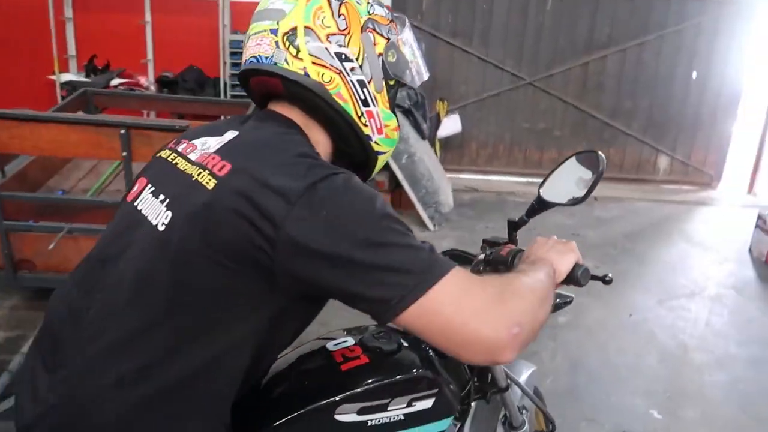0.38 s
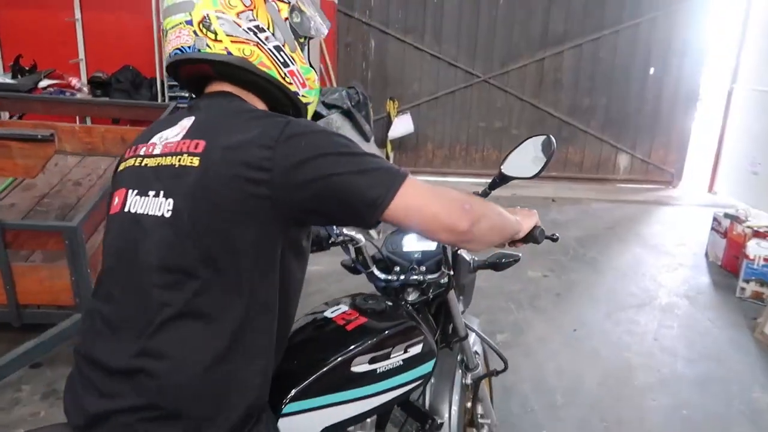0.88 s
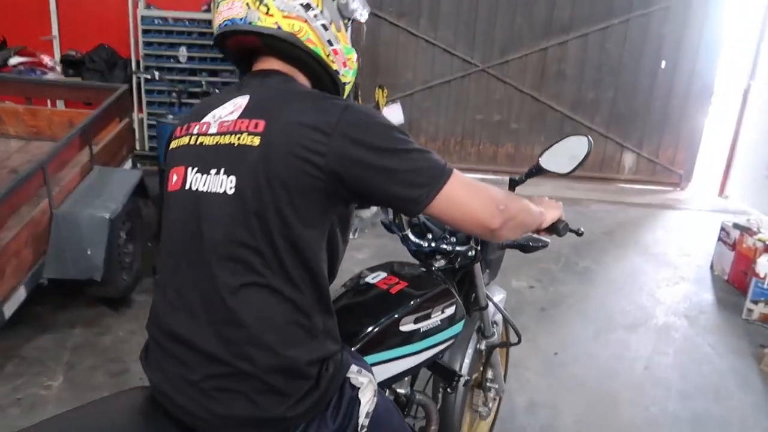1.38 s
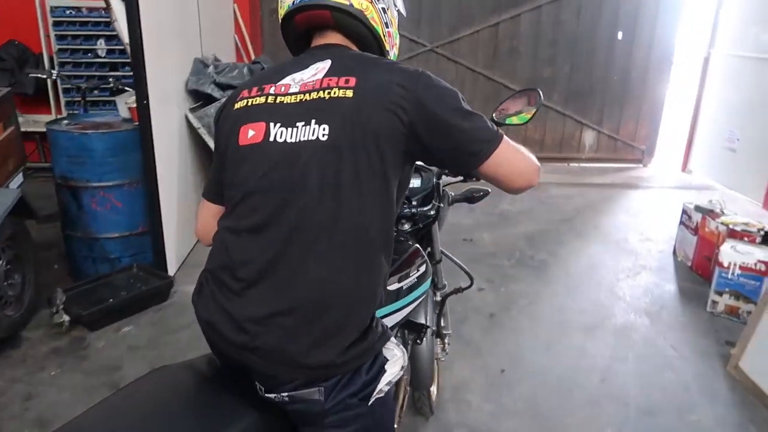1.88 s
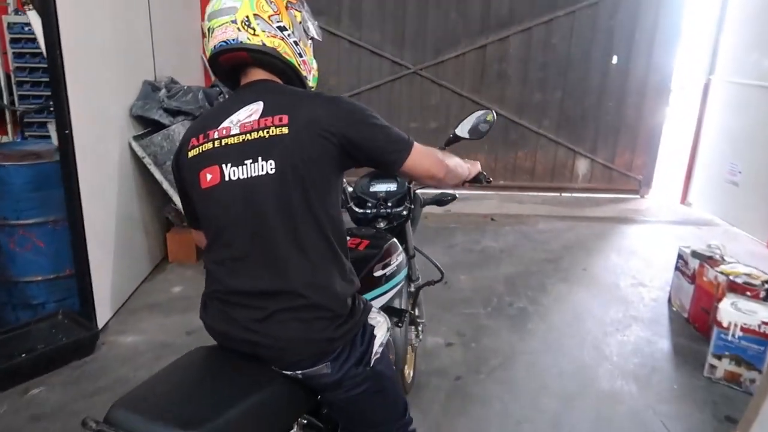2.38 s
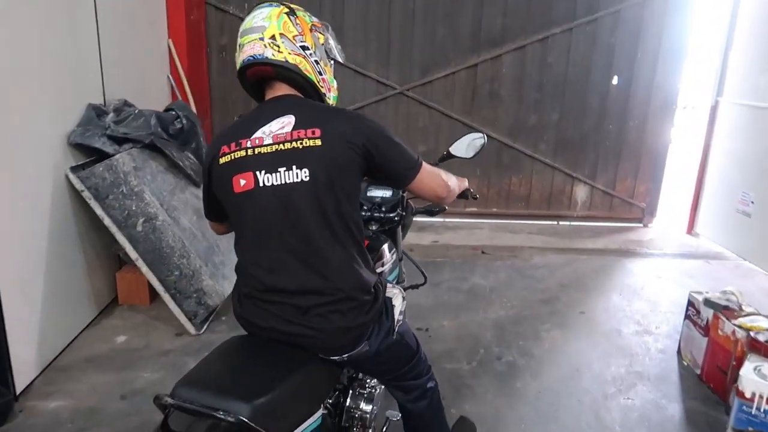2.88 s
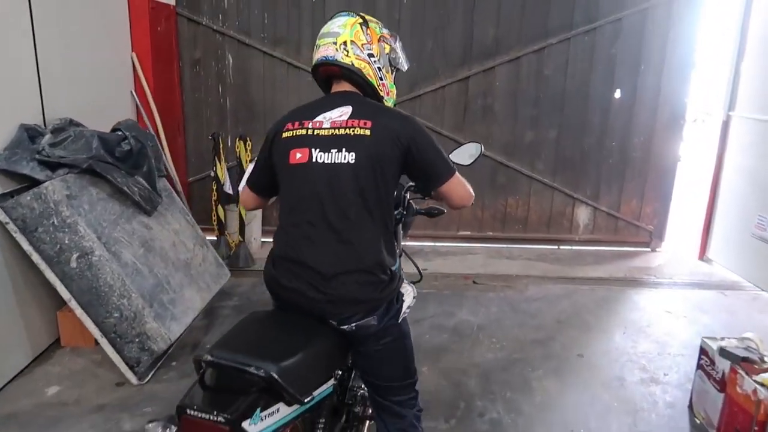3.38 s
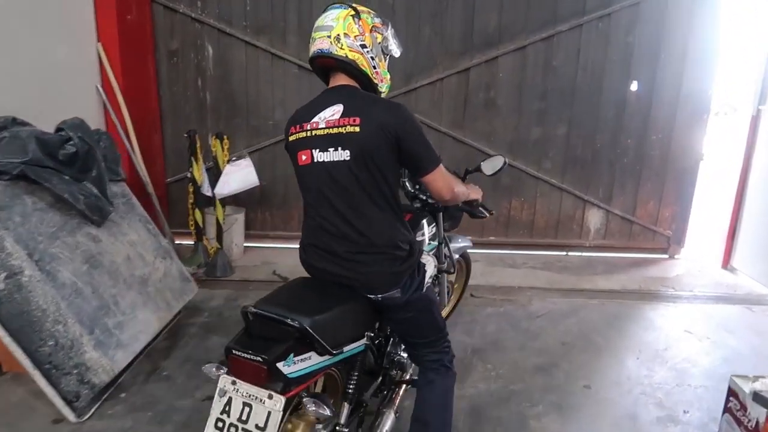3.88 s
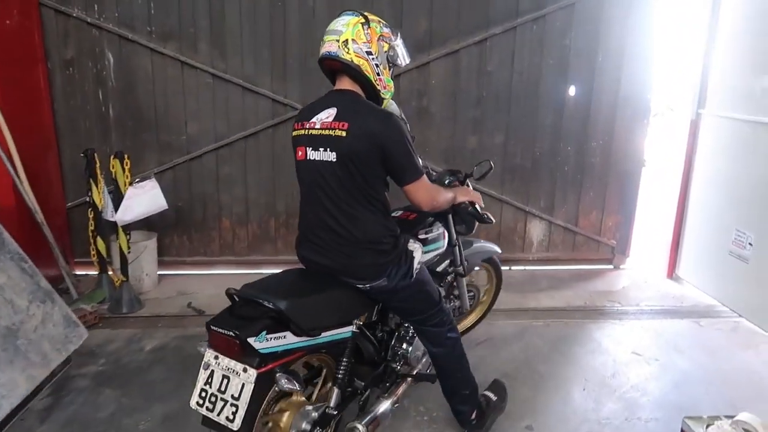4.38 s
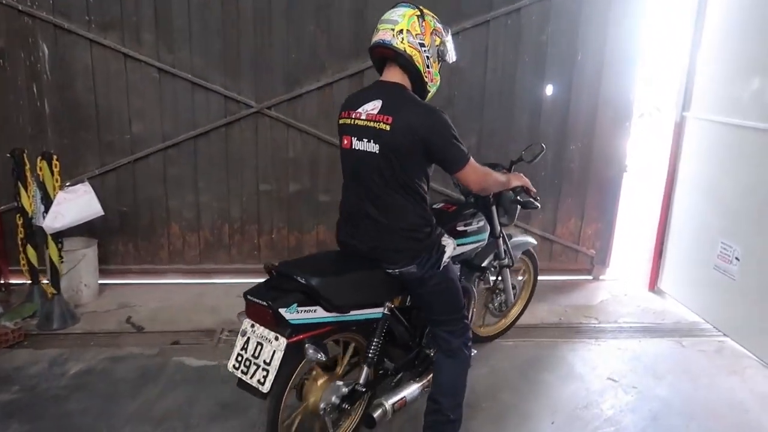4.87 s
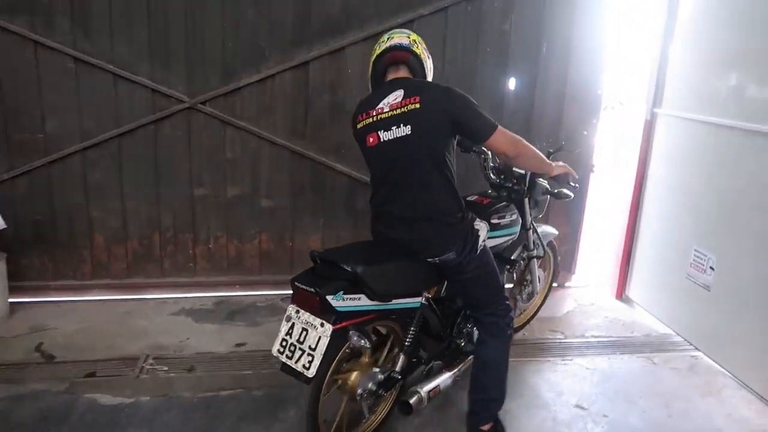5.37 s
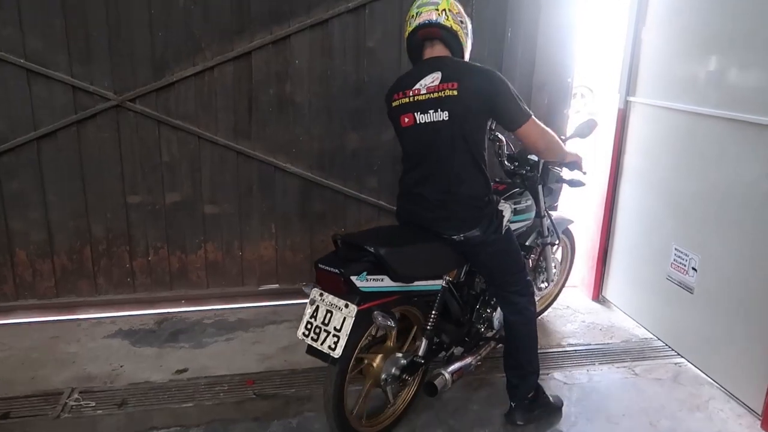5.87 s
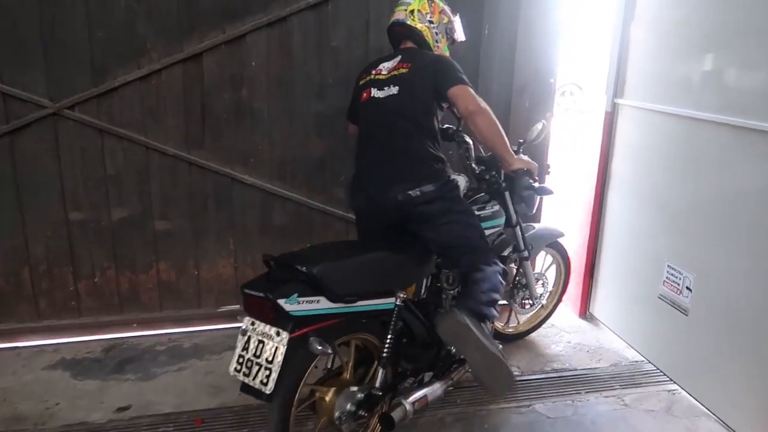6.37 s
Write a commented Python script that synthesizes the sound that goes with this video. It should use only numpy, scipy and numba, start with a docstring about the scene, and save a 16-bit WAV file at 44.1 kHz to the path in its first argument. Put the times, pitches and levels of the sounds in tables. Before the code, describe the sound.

Inside a reverberant workshop, a small single-cylinder motorcycle idles with a limping strong-weak beat and light valve clatter. The rider stabs the throttle several times, with bright exhaust cracks, then holds a faster, rough growl for about a second. Revs fall through more pops, waver, and return to a lumpy, boomy idle. A handheld microphone starts beside the engine and moves round behind the tailpipe.

```python
"""An uneven idle beat is heard first: a small single-cylinder motorcycle, then revved, in a hard-walled workshop.
Every crank turn gives a pressure pulse, strong and weak in turn, that excites resonances of pipe, silencer and room.
Turbulent gas rasps at each beat, the valve gear clatters steadily and single beats or runs of them crack brightly.
Feedback delays give the reverberation; band-limited noise gives a low rumble underneath."""
import sys
import numpy as np
from scipy import signal
from scipy.fft import rfft, irfft, next_fast_len
from scipy.io import wavfile
from scipy.ndimage import uniform_filter1d
from numba import njit

SR = 44100
rng = np.random.default_rng(int(sys.argv[2]) if len(sys.argv) > 2 else 0)


def volts_from_db(level):
    """Convert decibel levels to linear amplitude ratios."""
    exponent = np.asarray(level, float) / 20
    return 10 ** exponent


def put_to_file(sound):
    """Save the sound as 16-bit audio at rate SR, in the file named by the first command-line argument."""
    columns = np.atleast_2d(sound).T  # one column per channel
    safe = np.clip(columns, -1, 1)
    whole_steps = np.round(safe * 32767)
    wavfile.write(sys.argv[1], SR, whole_steps.astype(np.int16))


N = 286650

# speed of the crank: (time [s], speed [turns per s])
CRANK = [(0.0, 19.44), (0.55, 22.19), (1.2, 21.79), (1.79, 19.9), (1.95, 27.51), (2.08, 26.92),
         (2.19, 20.51), (2.4, 30.18), (2.5, 28.21), (2.65, 23.75), (2.74, 30.63), (2.87, 38.27),
         (3.7, 36.88), (3.8, 35.22), (3.87, 31.27), (3.96, 30.06), (4.05, 25.35), (4.12, 25.2), (4.2, 23.1),
         (4.3, 24.5), (4.37, 25.75), (4.45, 25.95), (4.7, 26.89), (4.93, 25.61), (5.06, 22.64),
         (6.5, 20.63)]
# how much stronger and earlier every second turn beats: (time [s], limp [0-1])
LIMP = [(0, 1), (1.8, 1), (1.9, .3), (2.75, .3), (2.85, 0), (4.1, 0), (4.16, .75), (4.85, .7), (4.95, 0),
        (5.02, .7), (5.5, 1), (6.5, 1)]
# position of the listener round the tailpipe: (time [s], position [0 beside - 1 behind])
BEHIND = [(0, 0.39), (1.3, 0.027), (2.0, 0.99), (4.0, 0.9), (5.5, 0.73), (6.5, 0.87)]
# resonances of the engine castings: (frequency [Hz], width [Hz], level [dB])
METAL_MODES = [(495.6, 45.6, 4.5), (686, 27, 1.5), (940, 960, -36.5), (1343, 89, 7), (1567, 284, 0.5),
               (2063, 54, 5.5), (2860, 83, -5.5)]
# single beats that crack brightly, a few at idle and most while the engine is revved,
# sizes before the layer gains: (time [s], peak [dB], treble [dB], ring frequency [Hz])
CRACKLE = [(0.323, -12, -45.5, 1500), (1.237, -18.5, -50.5, 826), (1.274, -15, -48.5, 2100),
           (1.9, -5.5, -29.5, 860), (1.936, -7, -36, 1280), (1.968, -23, -40, 630),
           (2.012, -12, -36.5, 1470), (2.045, -13, -35.5, 1250), (2.083, -9, -39, 1300),
           (2.123, -15.5, -37.5, 730), (2.3, -8, -33, 680), (2.337, -13, -35.5, 1310),
           (2.367, -14, -37, 664), (2.408, -26, -40, 970), (2.439, -11, -42, 860), (2.468, -23.5, -37, 885),
           (2.506, -12.5, -37, 940), (2.543, -16, -37, 815), (2.583, -23, -38.5, 899),
           (2.736, -7.5, -31.5, 970), (2.768, -9, -29.5, 676), (2.797, -14.5, -33.5, 760),
           (3.198, -11.5, -37.5, 1540), (3.655, -10.5, -36, 810), (3.734, -11, -47.5, 830),
           (3.764, -22, -45, 824), (3.88, -14.5, -42.5, 680), (3.911, -27, -37.5, 594),
           (3.944, -28, -35.5, 905), (3.976, -19, -37.5, 960), (4.01, -15.5, -37, 880),
           (4.05, -13.5, -40, 774), (4.094, -38.5, -43.5, 666), (4.87, -20, -39, 925),
           (4.91, -31, -38, 800), (4.949, -26, -36.5, 720), (5.026, -15, -37, 700)]
IDLE_SPEED = 22   # turns per s
PUFF_SPREAD_DB = 0.8   # chance in the strength of the gas puffs, before it grows with speed


def rms_one(x):
    """Normalization: scale to rms 1."""
    return x / np.sqrt(np.mean(x ** 2) + 1e-20)


def evened(x, span_s=0.69):
    """Envelope normalization: divide out the slow level, keeping the beat."""
    span = int(span_s * SR)
    power = uniform_filter1d(uniform_filter1d(x ** 2, span), span)
    return x / np.sqrt(power + 1e-12)


def in_time(rows):
    """Linear interpolation: the columns of a curve table at every sample."""
    s, *columns = np.transpose(rows)
    return [np.interp(np.arange(N) / SR, s, c) for c in columns]


def coloured(x, points):
    """Linear filtering: weight the spectrum by a (frequency [Hz], gain [dB]) curve."""
    hz, db = np.transpose(points)
    grid = np.arange(N // 2 + 1) * SR / N + 1
    gain_db = np.interp(np.log(grid), np.log(hz + 1), db)
    return irfft(rfft(x) * volts_from_db(gain_db), N)


def cut(x, hz, kind):
    """Band limitation by a second-order Butterworth edge."""
    return signal.sosfilt(signal.butter(2, hz, kind, fs=SR, output="sos"), x)


def hump(x, low_hz, high_hz):
    """Zero-phase filtering: each click becomes an even hump that swells and falls alike."""
    return signal.sosfiltfilt(signal.butter(1, [low_hz, high_hz], "band", fs=SR, output="sos"), x)


def dying(clicks, decay_s):
    """Exponential relaxation: each click becomes a jump that dies away."""
    return signal.lfilter([1], [1, -np.exp(-1 / (decay_s * SR))], clicks + 1e-18)


def wander(per_s):
    """Low-passed noise: slow chance with spread 1."""
    return rms_one(cut(rng.standard_normal(N), per_s, "low"))


def resonate(x, modes):
    """Modal superposition: parallel damped resonances with alternating signs."""
    out = 0
    for k, (hz, width, db) in enumerate(modes):
        r = np.exp(-np.pi * width / SR)
        a = [1, -2 * r * np.cos(2 * np.pi * hz / SR), r * r]
        gain = (-1) ** k * volts_from_db(db) * (1 - r * r) / 2
        out = out + gain * signal.lfilter([1, 0, -1], a, x + 1e-18)
    return out


@njit
def gliding(x, hz, width_hz):
    """Time-varying damped oscillator: a resonance whose centre and width move."""
    out = np.zeros(len(x))
    for i in range(2, len(x)):
        r = np.exp(-np.pi * width_hz[i] / SR)
        push = (1 - r * r) / 2 * (x[i] - x[i - 2])
        out[i] = push + 2 * r * np.cos(2 * np.pi * hz[i] / SR) * out[i - 1] - r * r * out[i - 2]
    return out


def twice(x, hz, width_hz):
    """Cascaded resonators: the tone swells before it dies."""
    width_hz = width_hz + np.zeros(N)
    return rms_one(gliding(gliding(x, hz, width_hz), hz, width_hz))


def blend(a, b, share):
    """Power-law mixing of two layers."""
    share = np.clip(share, 0, 1)
    return evened(np.sqrt(1 - share) * evened(a) + np.sqrt(share) * evened(b))


def rumble():
    """Band-limited noise: a low unsteady rumble, stronger while the engine limps."""
    level_db = -48 + 19.5 * in_time(LIMP)[0] ** 2
    noise = cut(cut(rng.standard_normal(N), 52, "high"), 104, "low")
    return volts_from_db(level_db) * rms_one(noise)


def workshop(x):
    """Reverberation by eight feedback delays, duller on every round as the walls absorb the treble."""
    t60_s, wall_cut_hz = 1, 1850   # decay time at low frequencies, first-order treble edge
    size = next_fast_len(N + 2 * SR)
    w = 2 * np.pi * np.arange(size // 2 + 1) / size
    dull = 1 / (1 + 1j * w * SR / (2 * np.pi * wall_cut_hz))
    walls = 0
    for k, lag_s in enumerate([.0253, .0291, .0337, .0379, .0431, .0473, .0529, .0587]):
        loop = volts_from_db(-60 * lag_s / t60_s) * dull * np.exp(-1j * w * lag_s * SR)
        walls = walls + (-1) ** k * loop / (1 - loop)
    return irfft(rfft(x, size) * walls, size)[:N]


def sides(mid):
    """Diffuse scattering: dying noise spreads the mid sound into the difference of two channels."""
    # side level against mid, rising with frequency: (frequency [Hz], level [dB])
    width = [(60, -75), (170, -48), (350, -28.5), (700, -26.5), (1400, -16), (2800, -10), (5600, -4.5),
             (10000, 4), (14000, 1.5)]
    scatter = rng.standard_normal(6000) * np.exp(-np.arange(6000) / (0.025 * SR))
    return coloured(signal.fftconvolve(mid, scatter / np.linalg.norm(scatter))[:N], width)


def turning(luck):
    """Phase integration: number, sample and lean (+ strong, - weak) of every turn; strong beats come early."""
    start_turn, limp_turns, jitter_s = .524, .1, .00035   # jitter is an rms time
    swaps_s, swap_s = [4.1, 4.55, 4.98, 6.025], .05   # strong and weak change places, over this half time
    speed, = in_time(CRANK)
    side = np.prod([np.clip((s - np.arange(N) / SR) / swap_s, -1, 1) for s in swaps_s], axis=0)
    turns = start_turn + np.cumsum(speed) / SR
    k = np.arange(1, int(turns[-1]))
    lean = np.interp(k, turns, in_time(LIMP)[0] * side) * (-1.) ** k
    at = np.interp(k - limp_turns * lean, turns, np.arange(N)) + jitter_s * SR * luck[k, 1]
    return k, at.astype(int), lean


def echoed(at):
    """Travel time: the sample at which the echo of each beat returns from the pipe end."""
    # the echo returns sooner for a while in the middle: (time [s], delay [s])
    pipe_echo = [(0, .0104), (4.15, .0104), (4.45, .0097), (4.6, .0086), (4.9, .0086), (5.03, .0104),
                 (6.5, .01)]
    return at + (in_time(pipe_echo)[0][at] * SR).astype(int)


def beats(luck, limp_db, spread_db, echo):
    """Impulse excitation: one click a turn; strong beats are followed by their echo from the pipe end."""
    k, at, lean = turning(luck)
    # beats grow more uneven with speed; some fall short, none overshoots far
    uneven = 1 + 0.22 * np.clip(in_time(CRANK)[0][at] - IDLE_SPEED, 0, None)
    size = volts_from_db(limp_db * lean + spread_db * uneven * np.clip(luck[k, 0], -1.8, 1))
    out = np.zeros(N + SR)
    out[at] = size
    out[echoed(at)] += echo * volts_from_db(1.5) * size * np.clip(lean, 0, 1)
    return out[:N]


def pull():
    """Relaxation of a driving rate: how fast the crank gathers speed, felt a moment later."""
    lag_s = 0.019
    gaining = np.clip(np.gradient(in_time(CRANK)[0]) * SR, 0, None)
    return dying(gaining, lag_s) / (lag_s * SR)


def shell(luck):
    """Resonance under turbulent forcing: puffs of gas keep one narrow metal mode singing."""
    puffs = 0.6 + rms_one(dying(beats(luck, limp_db=2.5, spread_db=-0.5, echo=0.3), 0.006))
    mode = (1363, 41, 0)   # Hz, width Hz, dB
    return volts_from_db(-46) * rms_one(resonate(puffs * rng.standard_normal(N), [mode]))


def mouth(luck):
    """Open-end resonance: each beat knocks a broad tone at the end of the pipe."""
    # the tone as the pipe end turns past the listener: (time [s], frequency [Hz], level [dB])
    mouth_tone = [(0, 560, -53.5), (.5, 528, -35), (1.1, 503, -36.5), (1.5, 557, -45.5), (2.2, 714, -44.5),
                  (2.9, 473, -41.5), (3.4, 690, -55), (3.75, 764, -32), (4.1, 770, -40.5), (4.3, 455, -43),
                  (4.6, 720, -36.5), (4.9, 730, -38), (5.4, 397, -51), (5.9, 843, -54), (6.5, 844, -39)]
    mouth_hz, mouth_db = in_time(mouth_tone)
    push = beats(luck, limp_db=5.5, spread_db=PUFF_SPREAD_DB, echo=1.0)
    return volts_from_db(mouth_db) * evened(twice(push, mouth_hz, 170))


def gas(luck, steady, decay_s, limp_db):
    """Turbulence: noise swells briefly at each beat over a steady part that grows with speed."""
    # spectrum of the gas noise: (frequency [Hz], spectral level [dB])
    gas_spectrum = [(300, 11), (500, -10.5), (800, -2), (1150, -9), (1380, -14), (1800, -16), (2100, -19),
                    (2500, -18.5), (3500, -26.5), (5000, -32), (7500, -42), (9500, -49), (12000, -52),
                    (15000, -68)]
    clicks = beats(luck, limp_db=limp_db, spread_db=PUFF_SPREAD_DB, echo=0.53)
    puffs = rms_one(dying(dying(clicks, decay_s), 0.00096))
    flow = steady * (in_time(CRANK)[0] / IDLE_SPEED) ** 0.48
    return coloured((flow + puffs) * rng.standard_normal(N), gas_spectrum)


def sizzle(luck):
    """High-passed turbulence: the thin top of each puff over the steady clatter of the valve gear."""
    return evened(cut(gas(luck, steady=4.7, decay_s=0.0013, limp_db=28.0), 1820, "high"))


def rasp(luck):
    """Modal response to turbulence: middle-range puffs ring more in the castings as the crank runs faster."""
    puffs = gas(luck, steady=1.45, decay_s=0.0026, limp_db=2.0)
    puffs = cut(cut(puffs, 315, "high"), 1900, "low")
    ringing_db = -5 + 0.25 * (in_time(CRANK)[0] - IDLE_SPEED)
    return evened(rms_one(puffs) + volts_from_db(ringing_db) * rms_one(resonate(puffs, METAL_MODES)))


def crack_clicks(luck, behind):
    """Impulse trains for body, treble and listed cracks alone; light on other beats, echoed on strong ones."""
    light_body = (-19, -1.5, -9, -3.5)   # dB, dB for a strong beat, dB behind the pipe, dB for strong behind it
    light_treble = (-48.5, -2, 13, 5)   # likewise
    echo_share, even_size = (0.69, 1), 0.7   # echo of body and treble; least size where the beat is even
    spread_db = 1.2
    k, at, lean = turning(luck)
    b = behind[at]
    s, peak_db, treble_db, _ = np.transpose(CRACKLE)
    free = np.abs(at[:, None] / SR - s).min(axis=1) > .012   # no listed crack within 12 ms
    out = np.zeros((3, N))
    for row, (db, strong, back, both) in enumerate((light_body, light_treble)):
        level_db = db + strong * lean + back * b + both * lean * b + spread_db * luck[k, 2 + row]
        size = free * np.maximum(np.abs(lean), even_size) * volts_from_db(level_db)
        out[row, at] = size
        out[row, np.minimum(echoed(at), N - 1)] += echo_share[row] * size * np.clip(lean, 0, 1)
    out[:, (s * SR).astype(int)] = volts_from_db(peak_db - 0.5), volts_from_db(treble_db + 6), volts_from_db(peak_db)
    return out


def cracks(luck, behind):
    """Impulse response: a pointed pressure pulse, a ring of the castings, a tone of its own and treble."""
    body, top, loud = crack_clicks(luck, behind)
    s, ring_hz = np.transpose(CRACKLE)[[0, 3]]
    latest = np.clip(np.searchsorted(s, np.arange(N) / SR + .001) - 1, 0, None)   # the crack now sounding
    own = gliding(cut(loud, 2800, "low"), ring_hz[latest], np.full(N, 170.))
    noise = rng.standard_normal((2, N))
    point = cut(cut(cut(body, 4200, "low"), 459, "low"), 180, "high")
    ring = resonate(2.7 * body + 0.98 * dying(body, 0.0023) * noise[0], METAL_MODES)
    hiss = cut(cut(dying(top, 0.0047) * noise[1], 1100, "high"), 3270, "low")
    tint_hz = rng.uniform(2800, 5600, len(s))[latest]   # the treble of each crack rings at its own place
    hiss = hiss + volts_from_db(7) * gliding(hiss, tint_hz, np.full(N, 450.))
    air = cut(dying(top, 0.002) * noise[1], 14000, "high")
    return volts_from_db(-10.5) * air + volts_from_db(31) * point + volts_from_db(3.0) * ring + volts_from_db(27.5) * own + volts_from_db(6.5) * hiss


def thud(luck):
    """Pulse radiation at speed: each beat is a pointed pulse over a rough low growl of noise."""
    push = np.roll(beats(luck, limp_db=1.0, spread_db=0.5, echo=0.3), -SR // 500)   # 2 ms early
    point = hump(hump(push, 60, 420), 90, 420)
    growl = cut(cut(rng.standard_normal(N), 85, "high"), 200, "low")
    return volts_from_db(-3) * evened(point) + volts_from_db(-6) * rms_one(cut(growl, 230, "low"))


def boom(luck, low_hz, held):
    """Coupled resonance: the lowest pipe modes, partly taken over by a long-ringing tone of the room."""
    # lowest pipe resonances: (frequency [Hz], width [Hz], level [dB])
    boom_modes = [(60.6, 5.4, -9.5), (66.3, 5.7, 7.5), (95.8, 39.3, 7.5), (129.6, 11, 7)]
    push = cut(beats(luck, limp_db=3.0, spread_db=0.8, echo=0.027), 160, "low")
    push = np.roll(push, int(.0006 * SR))   # just after the beat
    glide = uniform_filter1d(np.abs(np.gradient(low_hz)) * SR, SR // 20)   # Hz per s
    pipe = cut(resonate(push, boom_modes), 64, "high")
    room_width_hz = 8.4 + .07 * glide   # a moving tone is smeared
    return blend(pipe, twice(push, low_hz, room_width_hz), held)


def bark(luck, bark_db, bark_hz, upper_db, upper_hz, bare):
    """Resonant radiation: a rounded pressure pulse and the silencer tones it sets ringing."""
    # resonances of the silencer chambers: (frequency [Hz], width [Hz], level [dB])
    bark_modes = [(300, 40, 0), (375, 50, -8)]
    clicks = beats(luck, limp_db=1.5, spread_db=.7, echo=1.3)
    push = cut(cut(clicks, 1000, "low"), 240, "low")
    push = np.roll(push, -int(.003 * SR))   # the pressure pulse arrives ahead of the gas noise
    pulse = np.roll(hump(clicks, 85, 340), -SR // 1500)
    upper = twice(push, upper_hz, 40) + volts_from_db(-13.0) * rms_one(resonate(push, bark_modes))
    width_hz = 42 + 30 * in_time(BEHIND)[0] ** 2   # straight behind the pipe the tone dies sooner
    tone = gliding(push, bark_hz, width_hz)
    tone = gliding(tone, bark_hz, np.full(N, 130.))   # the broad passage it leaves through
    return volts_from_db(bark_db) * blend(tone, pulse, bare) + volts_from_db(upper_db - 14.0) * evened(upper)


def scene():
    """Superposition of the engine's layers with their reverberation, as two channels."""
    # how hard the engine works, as gas noise: (time [s], level [dB])
    effort = [(0.0, -28.5), (0.25, -36), (1.3, -37), (1.81, -33.5), (1.99, -35), (2.55, -33.5),
              (3.35, -27.5), (3.8, -28), (4.14, -35.5), (4.4, -37.5), (4.74, -32), (5.12, -34.5),
              (5.9, -34.5), (6.5, -29.5)]
    # tones the room favours as machine and listener move through its standing waves: (time [s],
    # low tone [Hz], boom level [dB], bark tone [Hz], bark level [dB], upper tone [Hz])
    standing = [(0, 86.5, -12.5, 205, -22, 227), (.45, 84.3, -14.5, 201, -25.5, 236.5),
                (.6, 88.5, -15.5, 218, -25, 293), (1.2, 90.7, -18, 194, -27.5, 284.5),
                (1.75, 97.1, -18, 202, -21, 273), (1.85, 95, -20, 190, -26, 204),
                (1.93, 124, -19.5, 218, -25, 231), (2.0, 103.5, -20.5, 245, -26, 241),
                (2.06, 85.7, -20.5, 170, -19.5, 238), (2.15, 81, -14.5, 149, -32.5, 248),
                (2.27, 85, -18, 173, -19, 229), (2.36, 99, -18, 225, -16.5, 270),
                (2.43, 104.4, -22.5, 185, -27, 263), (2.5, 85.3, -16, 167, -26, 303),
                (2.6, 69.2, -17.5, 183, -24.5, 274), (2.68, 83.4, -17, 196, -21, 220),
                (2.77, 141, -20, 183, -20, 241), (2.95, 79, -24, 166, -25, 217),
                (3.3, 82, -21.5, 160, -21, 229), (3.55, 101.3, -15.5, 170, -20, 252.5),
                (3.8, 113.4, -19.5, 144, -18.5, 272), (4.05, 85.7, -18, 194, -22.5, 273),
                (4.2, 90.3, -16.5, 204, -21, 328), (4.45, 107, -18, 204, -21, 339),
                (4.6, 111.6, -17.5, 228, -20, 357), (4.9, 99.4, -19.5, 238, -17.5, 391),
                (5.0, 89, -18.5, 199, -21, 226), (5.08, 93.9, -13.5, 181, -20.5, 271),
                (5.4, 90.2, -11, 192.6, -18, 347), (5.6, 90, -22, 199, -18.5, 312),
                (5.85, 85.2, -19.5, 199, -17, 287), (6.5, 92, -22.5, 197, -17.5, 300)]
    effort_db = in_time(effort)[0] + 36   # above idle
    behind, speed = in_time(BEHIND)[0], in_time(CRANK)[0]
    low_hz, boom_db, bark_hz, bark_db, upper_hz = in_time(standing)
    upper_db = -28.5 + 0.59 * effort_db + 3.1 * behind
    rasp_db = -33.5 + 0.67 * effort_db + 0.07 * behind
    sizzle_db = -43.5 + 0.59 * effort_db + 1.1 * behind
    luck = rng.standard_normal((int(N / SR * 40), 4))   # per turn: strength, timing, crack body, crack treble
    fast = np.clip((speed - 24) / (37 - 24), 0, 1)   # 1 at full speed, 37 turns per s
    # at full speed the pipe tones waver by 9 percent rms, below 14 Hz
    bark_hz, upper_hz = [hz * (1 + .09 * fast * wander(14)) for hz in (bark_hz, upper_hz)]
    upper_db = upper_db + 0.188 * pull()   # swells while the crank gathers speed
    # bare pulse is heard beside the machine and grows with speed
    bare = .42 * (1 - behind) + .034 * (speed - IDLE_SPEED)
    upper = bark(luck, bark_db, bark_hz, upper_db, upper_hz, bare)
    upper += volts_from_db(rasp_db) * rasp(luck) + volts_from_db(sizzle_db) * sizzle(luck)
    upper += mouth(luck) + cracks(luck, behind)
    upper += fast * (volts_from_db(bark_db) * thud(luck) + shell(luck))
    held = .09 * (boom_db + 24)   # the louder the boom, the more of it is the held room tone
    mid = volts_from_db(boom_db) * boom(luck, low_hz, held) + upper + volts_from_db(-16.5) * workshop(upper)
    mid = cut(cut(mid, 38, "high"), 38, "high") + rumble()
    side = sides(mid)
    return np.array([mid + side, mid - side])


def low_pass(x):
    """Removes everything above the highest recorded frequency."""
    return signal.sosfilt(signal.butter(12, 15200, fs=SR, output="sos"), x)


def record(dry):
    """Soft saturation: a hyperbolic tangent rounds the peaks."""
    rounded = 1.288 * np.tanh(dry / 1.312)
    return low_pass(rounded)


dry = scene()
out = record(dry)
put_to_file(out)
```